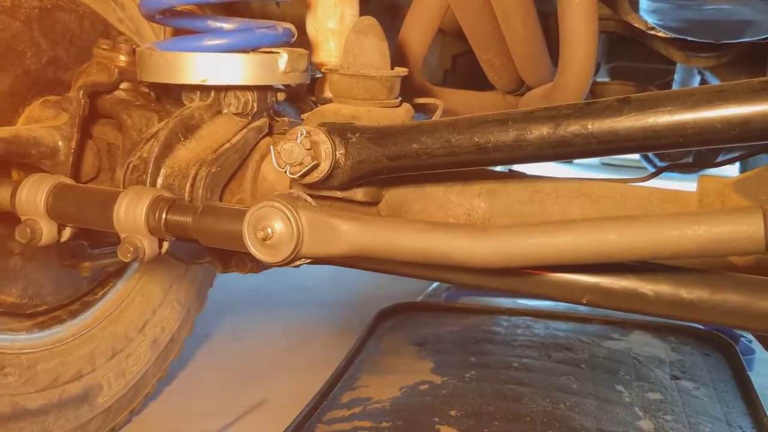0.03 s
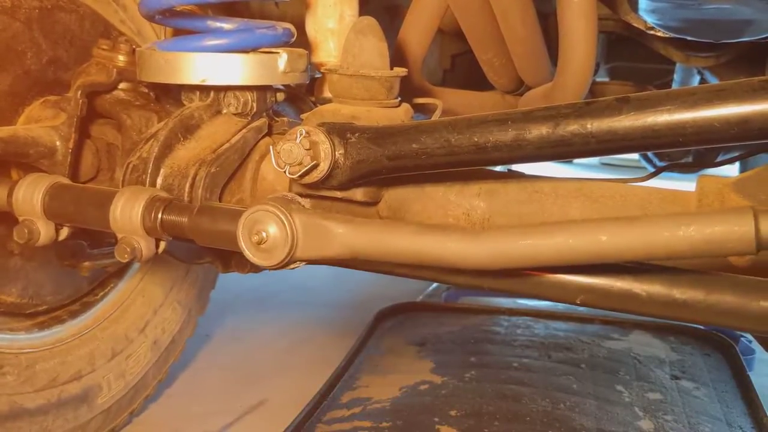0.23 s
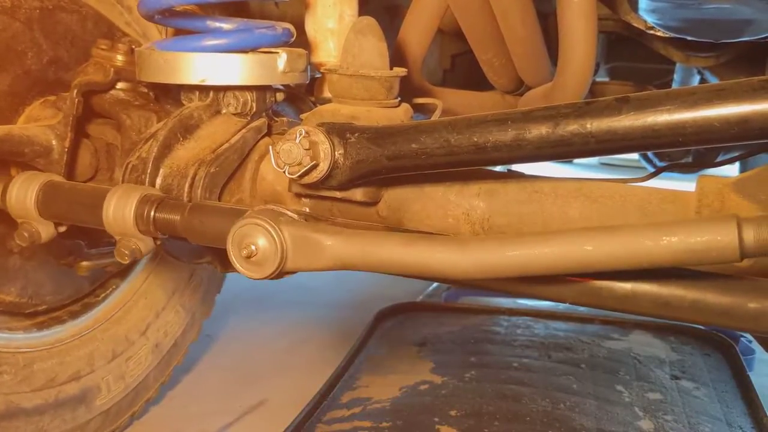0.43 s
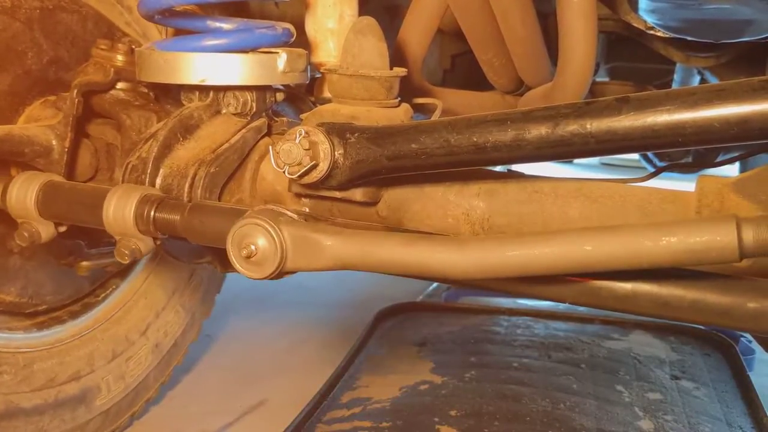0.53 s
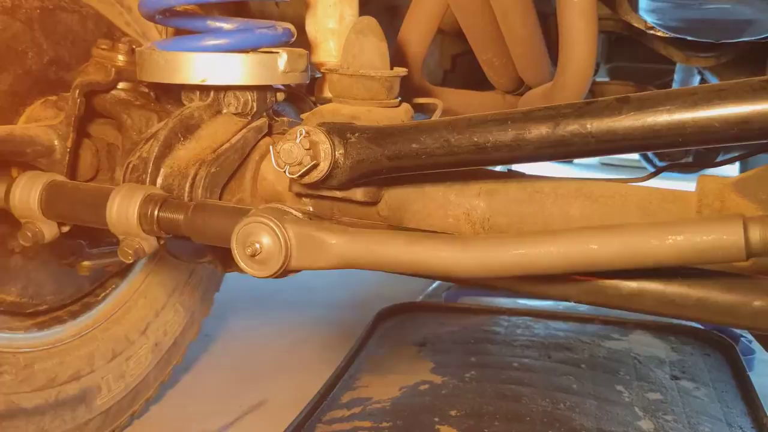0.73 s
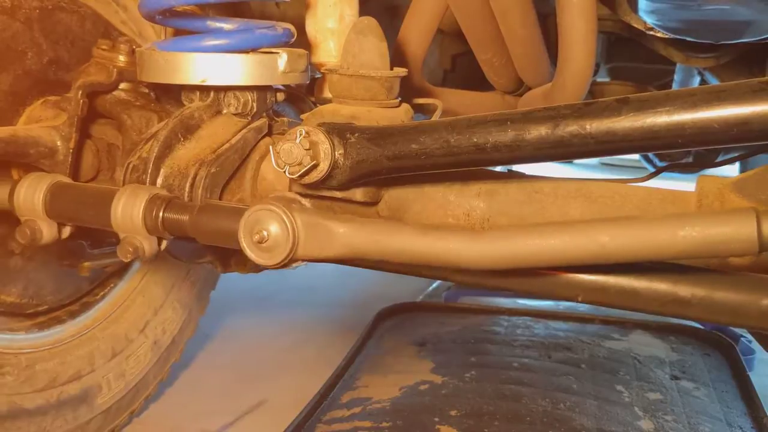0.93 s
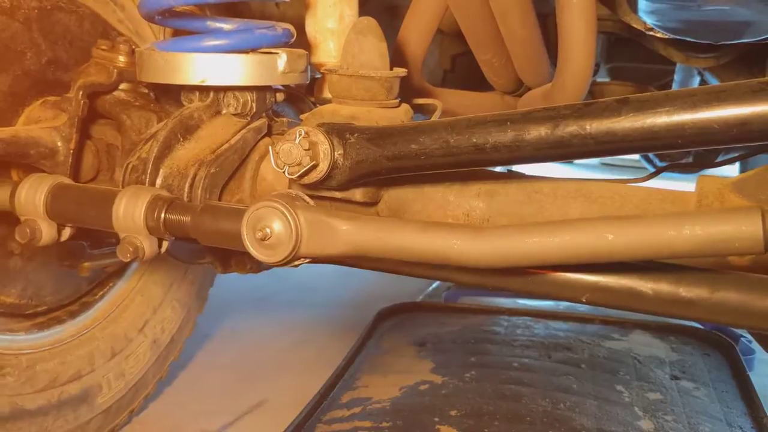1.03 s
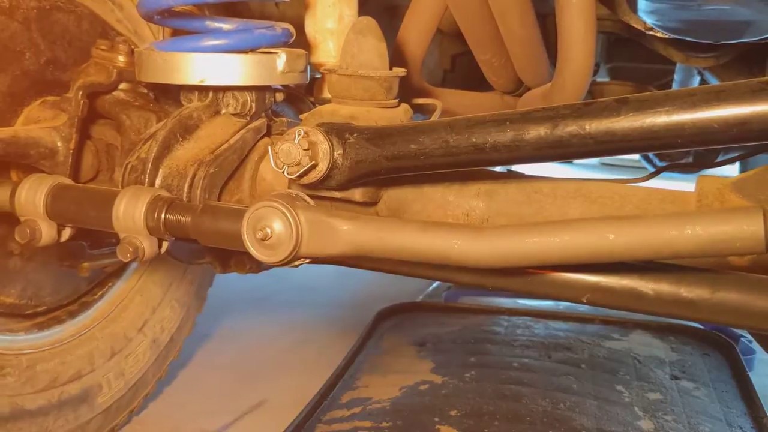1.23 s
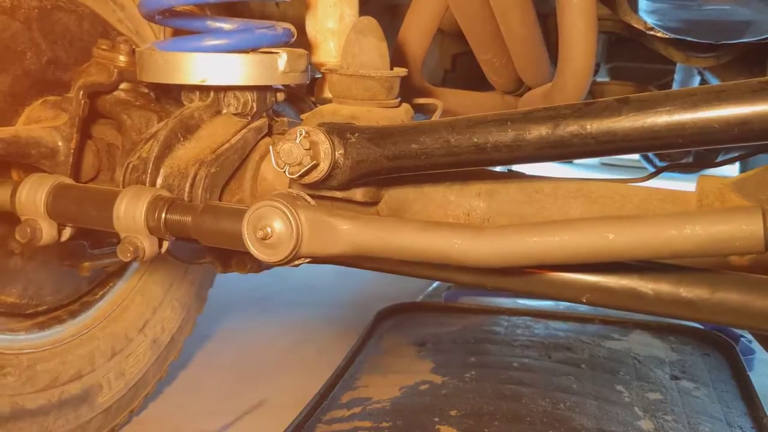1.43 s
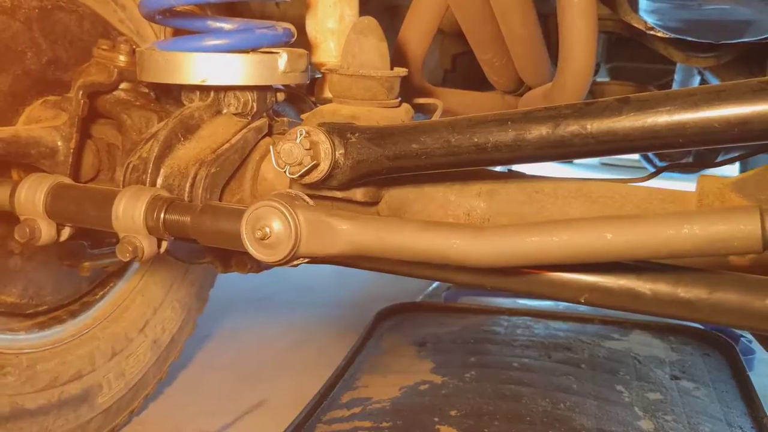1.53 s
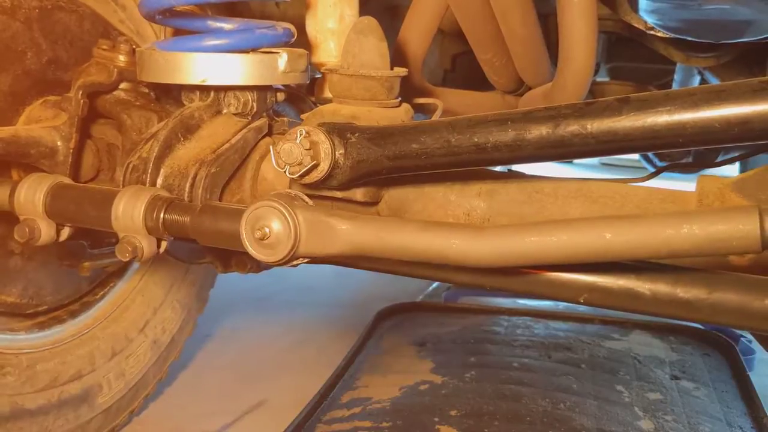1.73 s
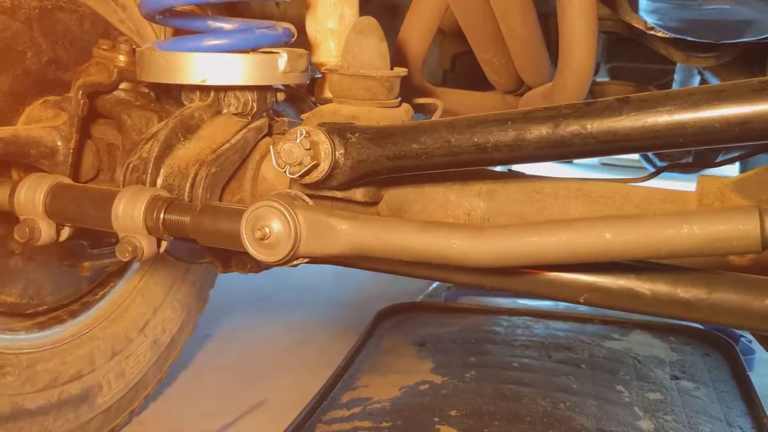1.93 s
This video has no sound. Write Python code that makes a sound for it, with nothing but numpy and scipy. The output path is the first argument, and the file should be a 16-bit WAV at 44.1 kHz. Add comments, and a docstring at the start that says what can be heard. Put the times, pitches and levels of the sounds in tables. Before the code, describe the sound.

Close under a vehicle in a garage, a loose steering linkage knocks lightly, then snaps into a hard steel clunk. Duller knocks and light clicks come after it, with faint chassis rumble and a brief panel hum at the end.

```python
"""A soft scuff and dull knocks over a low rumble: under a vehicle in a garage, a worn steering linkage
is rocked to and fro. A joint snaps free and the rod clunks against its stop, ringing the steel.
Weaker knocks and small clicks follow as the load reverses. The chassis rumbles under the strain,
the parts rub faintly, and a panel booms at the end. The garage gives the hits a short tail."""
import sys
import numpy as np
from scipy import signal
from scipy.fft import rfft, irfft, next_fast_len
from scipy.io import wavfile
from scipy.ndimage import map_coordinates

SR = 44100
rng = np.random.default_rng(int(sys.argv[2]) if len(sys.argv) > 2 else 0)


def wav_out(sig):
    """Save sig, one row per channel (or a flat mono array), as 16-bit PCM at SR to the path in sys.argv[1]."""
    wavfile.write(sys.argv[1], SR, np.round(np.clip(np.atleast_2d(sig).T, -1, 1) * 32767).astype(np.int16))


N = 88200

# The rod hits its stop and chatters. Each row: start in seconds, level in dB.
STOP_HITS = [(0.4198, -12.5), (0.4244, -10), (0.4279, -13.5)]
# The body of the clunk, then its steely bite. Each row: frequency in Hz, level in dB per octave.
CLUNK_EQ = [(60, -32.5), (160, -22.5), (290, -4.5), (400, -9.5), (520, -6.5), (690, 2), (800, -5),
            (1000, -5.5), (1400, 3.5), (2000, 1.5), (2400, -1), (2750, -9), (3400, -10), (4400, -15.5),
            (7000, -17.5), (15000, -28)]
BITE_EQ = [(1500, -20.5), (3500, -1), (5500, 1), (8000, -9), (15000, -26.5)]
# The ring of rod and axle, then the low hum of the chassis; the knocks share both.
# Each row: pitch in Hz, level in dB, seconds to fall 60 dB.
ROD_MODES = [(258, -15, .35), (284, -7, .2), (305, -5, .22), (484, -12, .3), (541, -9, .28),
             (581, -12, .38), (620, -14, .25), (686, -9, .22), (706, -10, .25), (748, -16, .3),
             (877, -14, .28), (897, -13, .24), (964, -12, .27), (1066, -12, .22), (1254, -10, .24),
             (1297, -4, .2), (1394, -10, .21), (1470, -4, .18), (1822, -11, .2), (2078, -10, .24),
             (2342, -14, .22), (2428, -16, .2), (3203, -22, .22), (3517, -21, .2), (3843, -17, .18)]
CHASSIS_MODES = [(80, -9.5, 0.96), (139.95, -2.5, 0.66), (196.2, 0, 0.58)]
CHASSIS_BUILD_S = 0.029

def clunk():
    """The main hit: hard contacts within ten milliseconds set the rod and chassis ringing."""
    out = np.zeros((2, N))
    for start, db in STOP_HITS:
        add(out, start, amp(db) * noise(CLUNK_EQ) * envelope(rise=0.00032, t60=0.0027))
    body = amp(-15.5) * burst(CLUNK_EQ, rise=0.0032, t60=0.16, pan_db=3.5)
    bite = amp(-19) * burst(BITE_EQ, rise=0.0007, t60=0.037, pan_db=3.5)
    rod = amp(-16) * ring(ROD_MODES, rise=0.0033) * pan(3.6)
    chassis = amp(-25.5) * ring(CHASSIS_MODES, CHASSIS_BUILD_S)
    add(out, STOP_HITS[0][0], body + bite + rod + chassis)
    return out


# A double crack just ahead of the clunk. Each row: start in seconds, level in dB.
SNAP_HITS = [(0.4075, -9.5), (0.4078, -7.5)]
# Its thin, bright tone. Each row: frequency in Hz, level in dB per octave.
SNAP_EQ = [(300, -51.5), (1500, -29), (3000, -18), (5000, -6.5), (8000, -6.5), (10500, 0.5), (15500, -5)]

def snaps():
    """The joint snaps free: very short cracks with a faint ring, left of centre."""
    out = np.zeros((2, N))
    for start, db in SNAP_HITS:
        crack = noise(SNAP_EQ) * envelope(rise=0.00008, t60=0.004) * pan(8)
        tail = amp(-18.5) * burst(SNAP_EQ, rise=0.0017, t60=0.075, pan_db=3)
        add(out, start, amp(db) * (crack + tail))
    return out


# The weaker knocks. Each row: start in seconds, attack in seconds, then thud, body, clank, edge
# and top in dB per octave.
KNOCK_HITS = [(0.103, 0.0027, -42, -43.5, -47, -56, -65), (0.121, 0.0027, -32.5, -38, -75, -74, -75),
              (.203, 0.0017, -27, -35, -37, -38.5, -64), (0.408, .004, -57, -36, -28.5, -42, -72),
              (.822, 0.00078, -28, -41, -45, -52, -81), (.881, 0.0017, -40.5, -33, -45, -40.5, -59),
              (0.894, 0.0022, -30.5, -32.5, -56, -69, -79), (.925, .004, -36.5, -43.5, -61, -60, -84),
              (0.9686, .0005, -39.5, -29, -35, -54, -80), (1.018, 0.0025, -40, -38.5, -46, -53.5, -81),
              (1.188, 0.03, -57, -63, -41.5, -57, -76), (1.52, .01, -63, -55, -52, -83, -87),
              (1.617, 0.0078, -36.5, -52, -80, -78, -82), (1.652, .001, -59, -49, -46, -62.5, -71),
              (1.683, 0.0017, -45.5, -42.5, -60, -66, -65), (1.721, 0.0022, -39.5, -47, -73, -52, -56.5)]
# Where thud, body, clank, edge and top sit, in Hz.
KNOCK_EQ_HZ = [130, 480, 1300, 3800, 9000]
KNOCK_LOW_HZ, DULL_DB_PER_OCTAVE = 65.5, 6.5

def knocks():
    """Play is taken up elsewhere in the linkage: softer blows that dull the rod's upper modes."""
    out = np.zeros((2, N))
    dull_modes = [(hz, db - DULL_DB_PER_OCTAVE * np.log2(max(hz / KNOCK_EQ_HZ[1], 1)), t60)
                  for hz, db, t60 in ROD_MODES]
    for start, rise, *levels in KNOCK_HITS:
        thud, body, *_, top = levels
        low_end = [(KNOCK_LOW_HZ / 2, thud - 34), (KNOCK_LOW_HZ, thud - 10)]
        eq = [*low_end, *zip(KNOCK_EQ_HZ, levels), (TOP_HZ, top - 4)]
        rod = amp(body + 2) * ring(dull_modes, rise)
        chassis = amp(thud - 3.5) * ring(CHASSIS_MODES, CHASSIS_BUILD_S)
        add(out, start, burst(eq, rise, t60=0.18, pan_db=1.5) + rod + chassis)
    return out


# Small joint clicks. Each row: start in seconds, attack in seconds, level in dB, seconds to fall 60 dB.
CLICK_HITS = [(0.2063, .001, -61, 0.055), (0.396, 0.00092, -46, .05), (0.814, 0.0028, -53.5, .05),
              (0.8212, 0.00018, -42, 0.0078), (.945, 0.0007, -51, .05), (0.971, .0003, -47, 0.022),
              (1.023, .0005, -66.5, 0.025), (1.128, .0005, -41, 0.11), (1.229, .001, -58.5, 0.049),
              (1.729, 0.0036, -51.5, 0.073), (1.737, 0.002, -47.5, 0.16)]
# Their crisp tone. Each row: frequency in Hz, level in dB per octave.
CLICK_EQ = [(800, -34), (2000, -11.5), (3300, -2.5), (4300, -3.5), (5500, 1.5), (7500, 3.5), (9500, -5),
            (15000, -10.5)]
# The ping of small joint parts. Each row: pitch in Hz, level in dB, seconds to fall 60 dB.
JOINT_MODES = [(3170, -15, .12), (5380, -6, .14), (5640, -3, .12), (6490, -3, .16), (7110, 1, .15),
               (7490, 1, .16)]

def clicks():
    """Light metal contacts with no weight behind them."""
    out = np.zeros((2, N))
    for start, rise, db, t60 in CLICK_HITS:
        ping = amp(-9.5) * min(t60 / 0.06, 1) * ring(JOINT_MODES, rise)  # the briefest hardly ring
        add(out, start, amp(db) * (burst(CLICK_EQ, rise, t60, pan_db=2.5) + ping))
    return out


# The panel's swells. Each row: peak time in seconds, attack in seconds, level in dB,
# seconds to fall 60 dB, buzz in dB relative to the swell.
PANEL_SWELLS = [(1.684, 0.074, -25.5, 0.14, -23.5), (1.72, 0.0096, -40.5, 0.1, 2),
                (1.789, 0.057, -38, .25, -13.5), (1.867, 0.088, -35, 0.43, -41)]
# The overtones in its buzz. Each row: multiple of the pitch, level in dB.
PANEL_OVERTONES = [(2, 0), (3, -0.5), (4, -4.5), (5, -20), (6, -16)]
PANEL_HZ = 101.9

def panel_boom():
    """One low panel resonance swells, buzzes near its height and rings out."""
    t, tone_gain, buzz_gain = clock(), 0, 0
    for peak, rise, db, t60, buzz_db in PANEL_SWELLS:
        from_peak = abs(t - peak)
        swell = amp(db) * np.where(t < peak, np.exp(-2 * from_peak / rise), fade(from_peak, t60))
        tone_gain += swell
        buzz_gain += swell * amp(buzz_db)
    phase = 2 * np.pi * PANEL_HZ * t + 0.26 * wobble(29)
    buzz = sum(amp(db) * np.sin(k * phase + wobble(45)) for k, db in PANEL_OVERTONES)
    return tone_gain * np.sin(phase) + buzz_gain * buzz


# Soft scuffs in the joints. Each row: start in seconds, level in dB.
SCUFF_CUES = [(.048, -56.5), (0.373, -58), (.735, -61), (0.869, -49), (1.06, -54), (1.272, -61.5),
              (1.57, -68)]
# Their midrange rasp. Each row: frequency in Hz, level in dB per octave.
SCUFF_EQ = [(500, -7.5), (1500, 4), (2600, 6.5), (4000, -4.5), (8000, -12.5), (15000, -22.5)]

def scuffs():
    """Brief slides of one part over another."""
    out = np.zeros((2, N))
    for start, db in SCUFF_CUES:
        add(out, start, amp(db) * burst(SCUFF_EQ, rise=0.0082, t60=0.17, pan_db=0.5))
    return out


# The rumble rides the strain. Each row: time in seconds, relative level in dB.
RUMBLE_FADER = [(0, -49.5), (.12, -43.5), (.24, -37), (.38, -38), (.52, -32), (.63, -43), (.72, -49.5),
                (.8, -44.5), (.92, -32.5), (1.05, -40.5), (1.2, -45), (1.4, -51.5), (1.6, -51), (2, -53.5)]
# Its bass-heavy tone. Each row: frequency in Hz, level in dB per octave.
RUMBLE_EQ = [(20, -37.5), (32, -40.5), (42, -11), (62, 0), (85, 0), (130, -0.5), (200, -2.5), (300, -6),
             (600, -8), (1200, -17.5), (3000, -22.5), (8000, -54)]

def chassis_rumble():
    """The chassis rumbles as the strain comes and goes."""
    return amp(-1.5) * fader(RUMBLE_FADER) * noise(RUMBLE_EQ)


# The rubbing swells and sinks. Each row: time in seconds, level in dB.
RUB_FADER = [(0, -87), (.09, -67), (.16, -73.5), (.29, -70), (.35, -65.5), (.5, -58), (.57, -52),
             (.66, -73), (.78, -74.5), (.9, -65.5), (1.08, -68), (1.29, -81), (1.42, -70.5), (1.55, -86),
             (2, -83)]
# Its dry hiss. Each row: frequency in Hz, level in dB per octave.
RUB_EQ = [(1000, -11.5), (3000, -4), (7000, 0), (15000, -6)]

def rubbing():
    """Dry parts rub faintly; a fast flutter in level makes the hiss gritty."""
    grit = amp(1.2 * wobble(92))
    return fader(RUB_FADER) * grit * noise(RUB_EQ) * pan(2)


# The room tone. Each row: frequency in Hz, level in dB per octave.
AIR_EQ = [(25, -60), (100, -53), (300, -64.5), (700, -72.5), (1500, -70), (3000, -78.5), (7000, -70.5),
          (10000, -76), (15000, -83.5)]

def still_air():
    """A quiet, steady bed of air under everything."""
    return noise(AIR_EQ) * pan(0.74)


# The garage's reverb. Each row: frequency in Hz, seconds to fall 60 dB.
GARAGE_DECAY = [(100, 0.54), (300, 0.63), (1000, 0.44), (3000, 0.26), (7000, 0.22), (15000, 0.15)]

def garage(source, t60):
    """The room's answer to a burst that lasts t60; treble dies first."""
    hz, t, spectrum = signal.stft(source, SR, nperseg=256)
    room_t60 = along(GARAGE_DECAY, hz)[:, None]
    decaying = spectrum * fade(t, room_t60) * np.sqrt(t60 / room_t60)
    tail = signal.istft(decaying, SR, nperseg=256)[1][:, :N]
    return amp(-4) * pan(1) * tail * attack(0.0097)


# The stereo image of noise and ringing. Each row: frequency in Hz, left-right likeness (1 is mono).
STEREO_LIKENESS = [(60, .99), (130, 1), (290, 0.91), (640, 0.63), (1400, -0.083), (3000, -0.024),
                   (7000, 0.31), (15000, 1)]

def stereo_angle(hz):
    """Width in radians: zero reaches both ears alike."""
    return np.arccos(np.clip(along(STEREO_LIKENESS, hz), -1, 1)) / 2


def noise(eq, peaks=1):
    """Stereo noise with the given level per octave."""
    hz = np.fft.rfftfreq(N, 1 / SR)
    width = stereo_angle(hz)
    per_octave = np.sqrt(SR / 2 / np.log(2) / np.maximum(hz, eq[0][0]))
    gain = amp(along(eq, hz)) * per_octave * peaks
    white = rfft(rng.standard_normal((2, N)))
    mid, side = irfft(white * gain * [np.cos(width), np.sin(width)], N)
    return np.array([mid + side, mid - side])


def ring(modes, rise):
    """Clear modes, struck a little differently each time."""
    t, out = clock()[:N // 2], np.zeros((2, N))
    for hz, db, t60 in modes:
        stray_db, phase, side = rng.standard_normal(3)
        spread = stereo_angle(hz) * np.sign(side) * np.array([[1], [-1]])
        tone = np.sin(2 * np.pi * (hz * t + phase) + spread)
        out[:, :len(t)] += amp(db + stray_db) * fade(t, t60) * tone
    return out * attack(rise)


def burst(eq, rise, t60, pan_db):
    """A contact rings the crowded, damped modes of the steel parts and then the room."""
    peaks = crowded_modes()
    direct = noise(eq, peaks) * envelope(rise, t60) * pan(pan_db)
    return direct + garage(noise(eq, peaks), t60)


def crowded_modes(ripple_db=3.5, cluster_db=3.5, width_hz=22, widens_above_hz=4000):
    """Gain per frequency: narrow peaks that gather in clusters toward the treble."""
    hz = np.fft.rfftfreq(N, 1 / SR)
    place = np.log1p(hz / widens_above_hz) * widens_above_hz / width_hz
    narrow, clusters = rng.standard_normal((2, 2048))
    db = ripple_db * map_coordinates(narrow, [place], order=1)
    db += cluster_db * hz / (hz + 1200) * map_coordinates(clusters, [place / 4], order=1)
    return amp(db) / np.sqrt(np.mean(amp(2 * db)))


def amp(db):
    """Decibels to gain."""
    return 10 ** (np.asarray(db) / 20)


def along(points, hz):
    """Read a curve of (Hz, value) points on a log axis."""
    freqs, values = np.transpose(points)
    return np.interp(np.log(hz + 1), np.log(freqs), values)


def clock():
    """Time of each sample in seconds."""
    return np.arange(N) / SR


def fader(points):
    """Gain riding through (seconds, dB) points."""
    return amp(np.interp(clock(), *np.transpose(points)))


def attack(rise):
    """Fade-in with a time constant of rise seconds."""
    return 1 - np.exp(-clock() / rise)


def fade(t, t60):
    """Decay of 60 dB every t60 seconds."""
    return np.exp(-np.log(1000) * t / t60)


def envelope(rise, t60):
    """Quick attack, exponential release."""
    return attack(rise) * fade(clock(), t60)


def pan(db):
    """Left and right gains, with the left louder by db."""
    return amp(np.array([[db], [-db]]) / 2)


def add(out, start, sound):
    """Mix a sound in from start seconds."""
    i = round(start * SR)
    out[:, i:] += sound[:, :N - i]


def wobble(rate):
    """A smooth random curve, rate knots a second."""
    return map_coordinates(rng.standard_normal(int(N * rate / SR) + 4), [clock() * rate])


def scene():
    """Everything heard from close by the axle."""
    linkage = snaps() + clunk() + knocks() + clicks() + scuffs()
    return linkage + panel_boom() + chassis_rumble() + rubbing() + still_air()


LOW_CUT_HZ, TOP_HZ, TOP_TAPER_HZ = 40, 16600, 900

def record(dry):
    """Roll off the deepest bass and cut the very top."""
    size = next_fast_len(N + SR // 2)
    hz = np.fft.rfftfreq(size, 1 / SR)
    high_cut = np.sin(np.pi / 2 * np.clip((TOP_HZ - hz) / TOP_TAPER_HZ, 0, 1)) ** 2
    low_cut = hz ** 2 / np.hypot(hz ** 2, LOW_CUT_HZ ** 2)
    return irfft(rfft(dry, size) * high_cut * low_cut, size)[:, :N]


dry = scene()
out = record(dry)
wav_out(out)
```